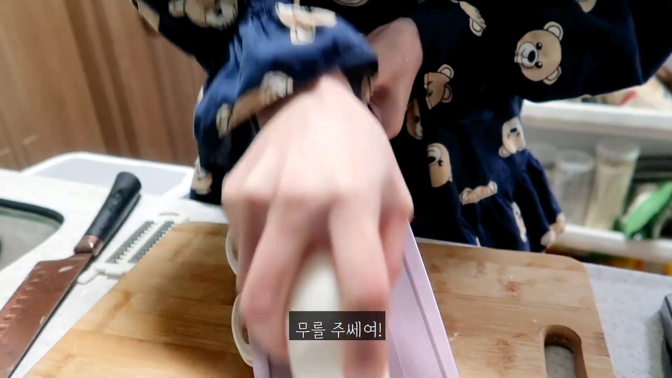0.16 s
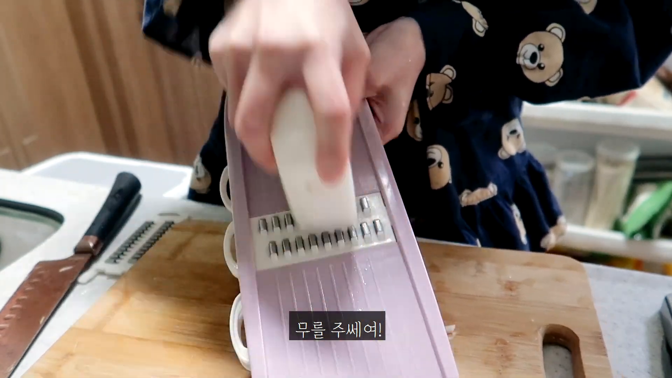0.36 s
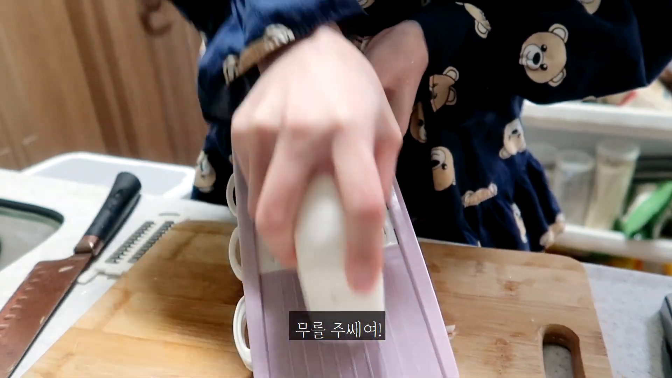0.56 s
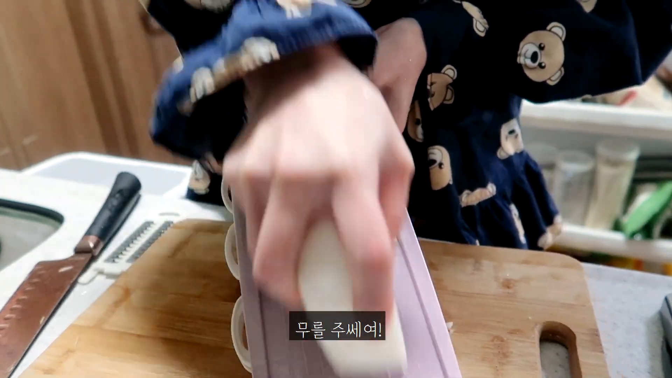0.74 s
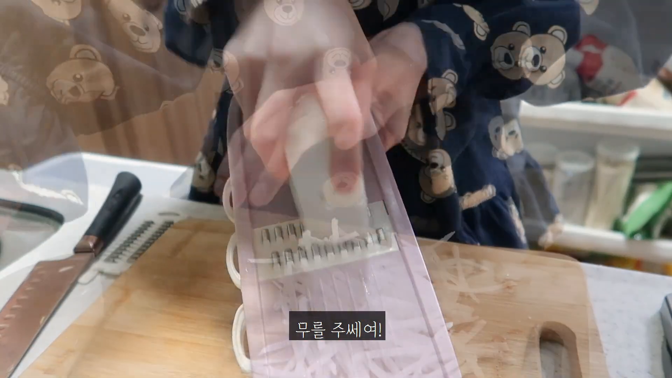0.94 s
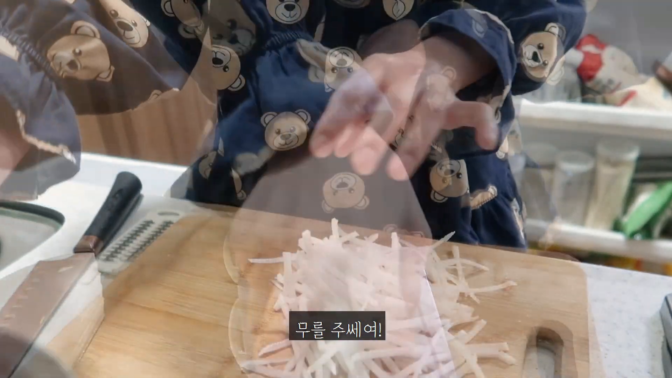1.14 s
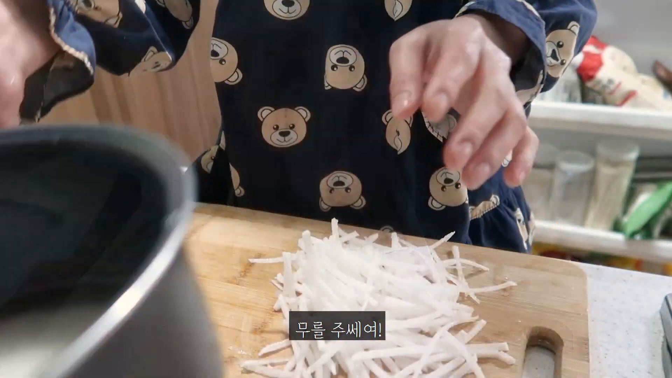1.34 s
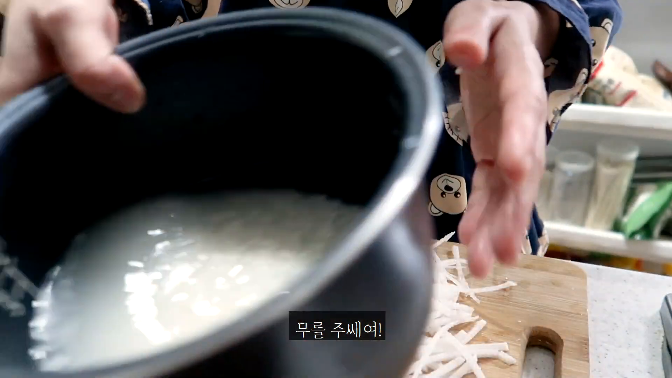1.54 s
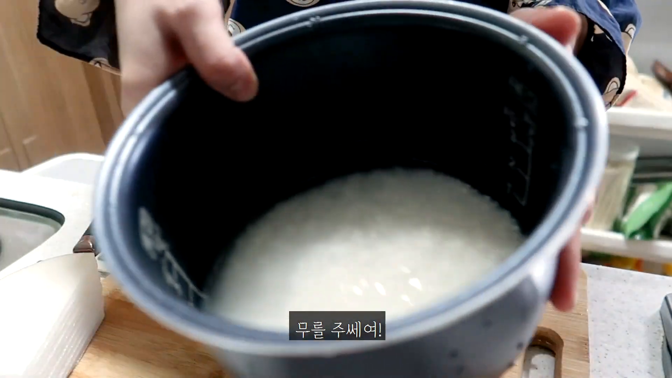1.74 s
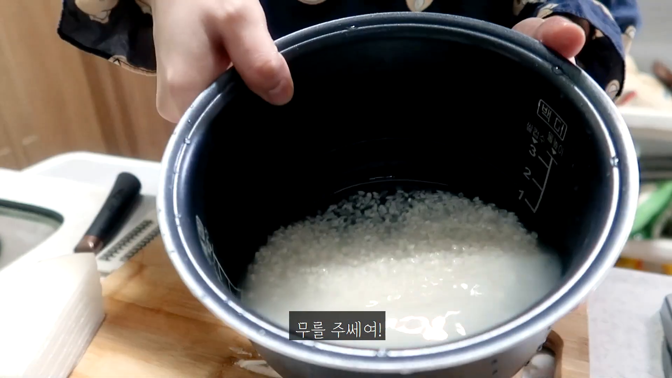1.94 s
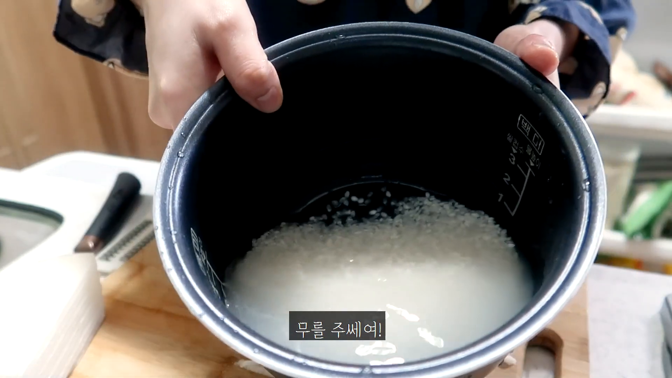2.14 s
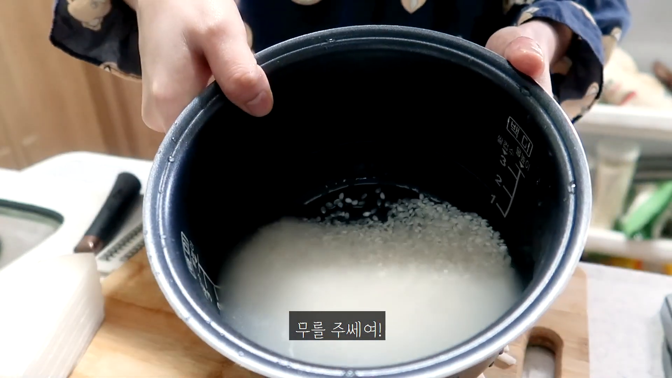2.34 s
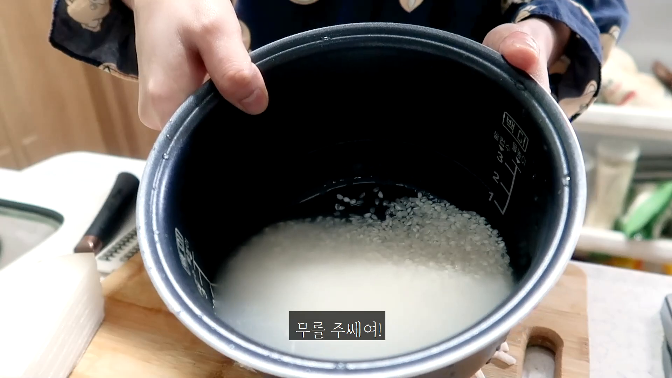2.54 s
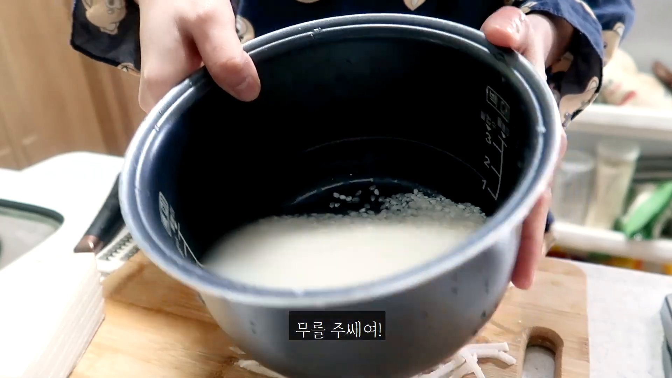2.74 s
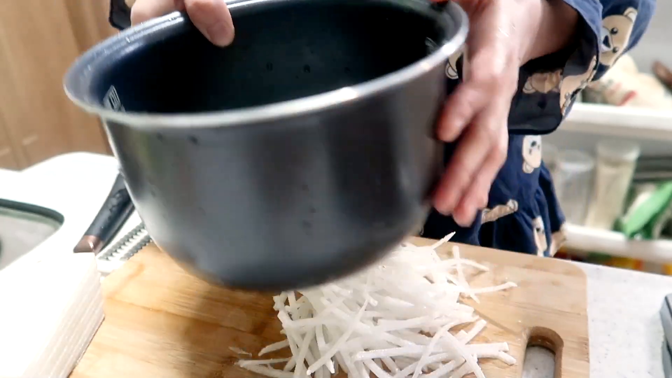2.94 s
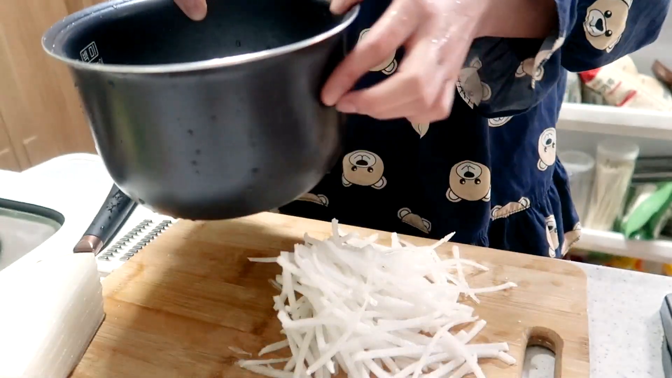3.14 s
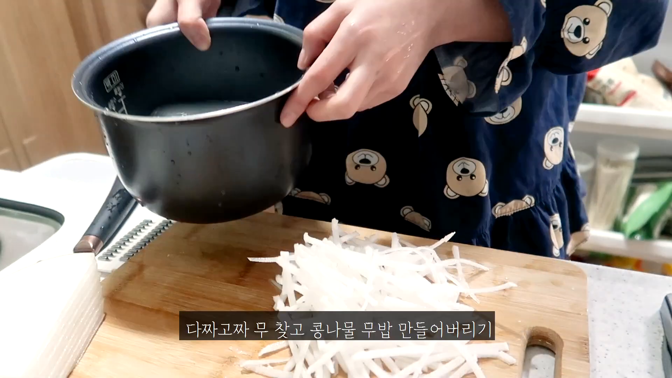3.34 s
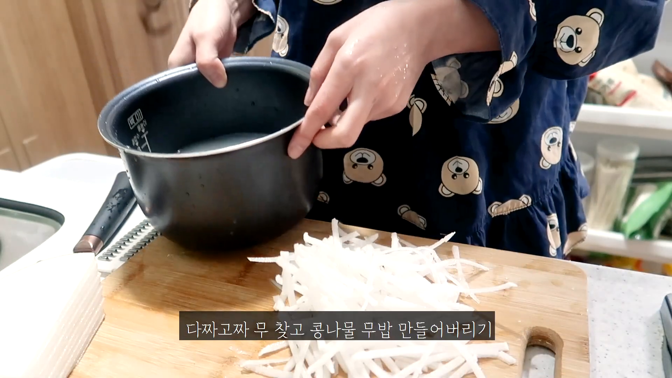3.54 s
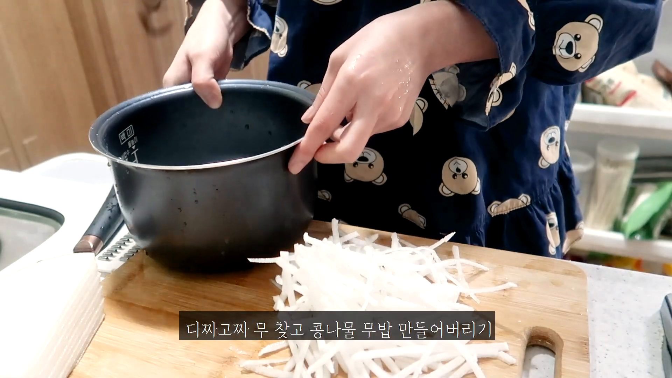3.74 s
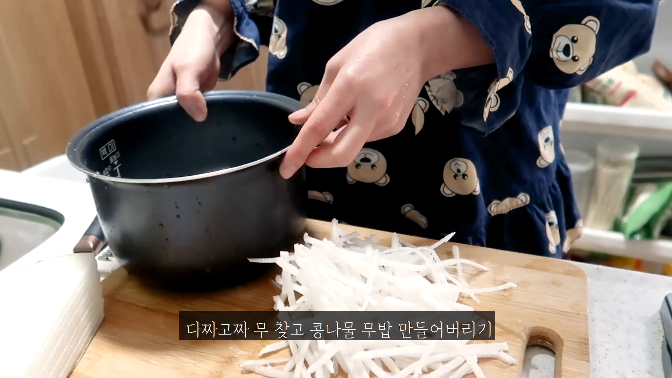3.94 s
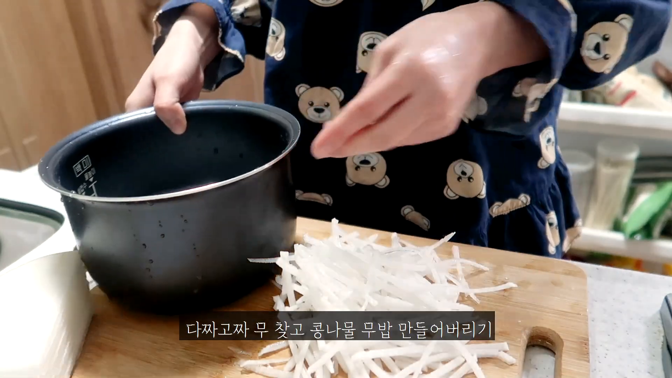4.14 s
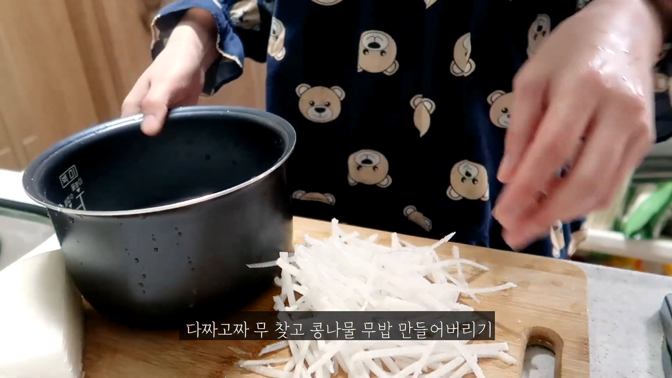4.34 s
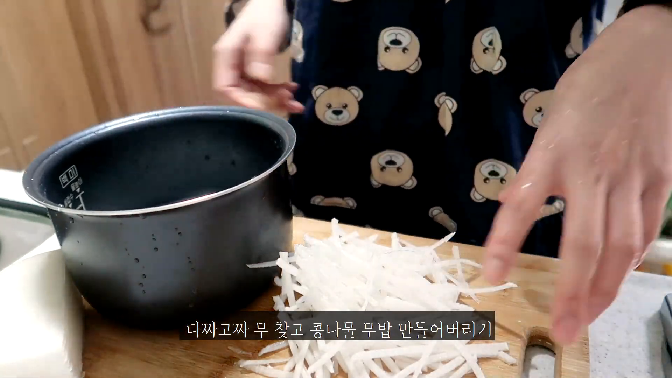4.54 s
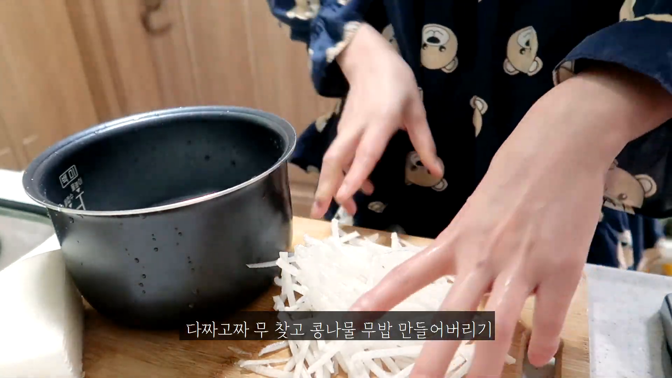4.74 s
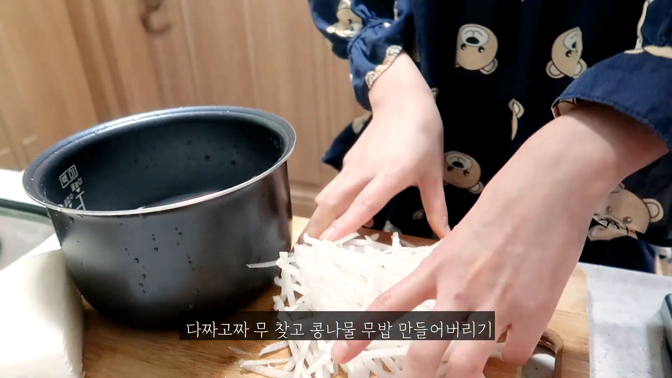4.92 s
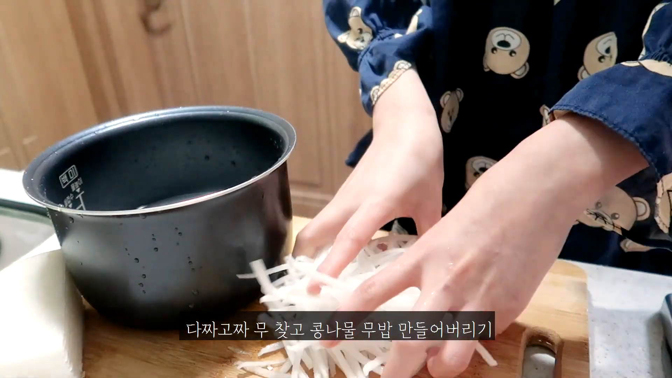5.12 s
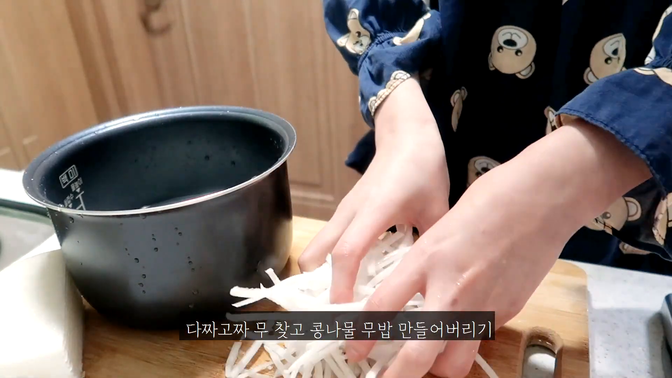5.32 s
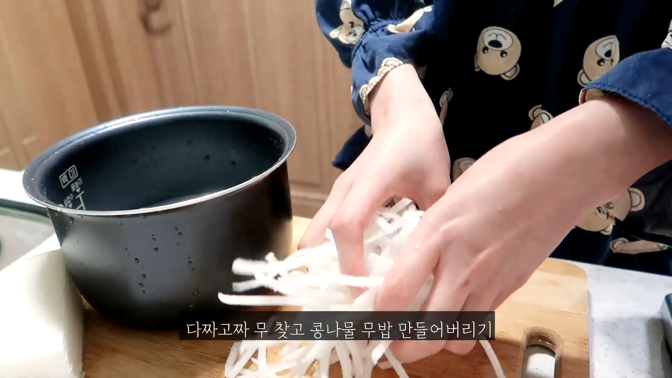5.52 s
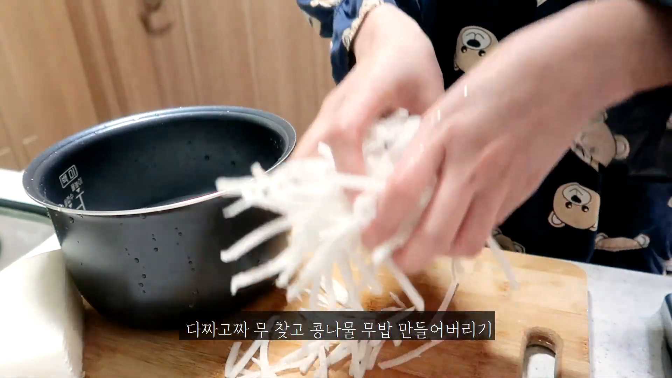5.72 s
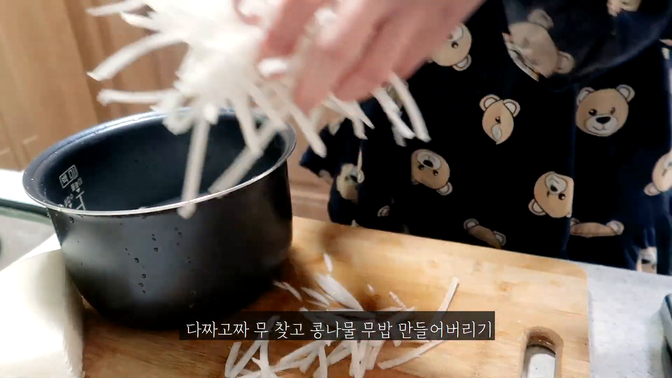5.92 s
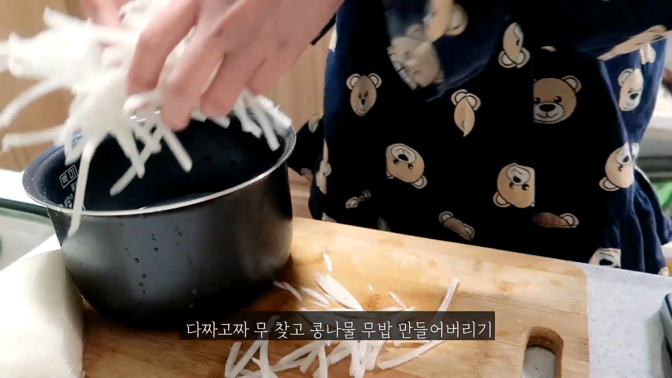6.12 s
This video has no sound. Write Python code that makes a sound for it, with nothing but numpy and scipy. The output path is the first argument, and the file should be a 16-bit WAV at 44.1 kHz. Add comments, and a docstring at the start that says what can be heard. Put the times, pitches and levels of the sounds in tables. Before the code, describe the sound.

In a small kitchen with a soft appliance hum, a firm radish is grated in quick wet strokes on a plastic slicer, clacking and booming at the turns. The rasp stops abruptly; faint handling ticks follow. A metal pot knocks hard on a wooden board and slides grittily, then wet shreds are scooped up with soft crunches. Close stereo microphone, short room tail.

```python
"""First a radish is pushed in quick strokes over the teeth of a plastic slicer: noise grains rasp, plate and frame ring.
Then a metal pot comes with small ticks, is knocked down on a wooden board (ringing tones) and slid aside (gritty noise).
A sleeve rustles and wet shreds are gathered up, crackling; short gliding tones groan here and there.
All along, a small kitchen with a humming appliance is heard close by in stereo, as soft noise and two low tones."""
import sys
import numpy as np
from scipy import signal
from scipy.fft import rfft, irfft, next_fast_len
from scipy.io import wavfile
from scipy.ndimage import uniform_filter1d, map_coordinates

SR = 44100
rng = np.random.default_rng(int(sys.argv[2]) if len(sys.argv) > 2 else 0)


def transcribe(u):
    """Save the signal u as a 16-bit wav file named by the first command-line argument.

    u: samples, shape (n,) or (channels, n), limited to [-1, 1]; the rate is SR.
    q: integer samples, one column per channel.
    """
    v = np.clip(np.atleast_2d(u).T, -1, 1)
    q = np.round(v * 32767).astype(np.int16)
    wavfile.write(sys.argv[1], SR, q)


N = 276507
TIME = np.arange(N) / SR  # seconds
TAIL = TIME[:SR // 2]  # half a second, for short sounds and rings

# All dB below are relative: later steps mix the sounds. T60 is the time to fade by 60 dB;
# a time constant is the time to fade to about 37 percent.

# Soft fan noise. Each row: frequency in Hz, level in dB.
FAN_SPECTRUM = [(13, -63), (22, -12.5), (123, -2.5), (224, -12), (279, -10), (319, -20.5), (420, -16),
                (582, -22), (745, -16.5), (877, -24), (1030, -23.5), (2040, -31.5), (3000, -34.5),
                (11400, -53), (15000, -71)]
FAN_DB = -50.5
# Steady tones of the appliance. Each row: frequency in Hz, level in dB before it wavers.
HUM_TONES = [(86, -53), (118, -52.5)]

# Side (left-right difference) against middle for spread-out sound. Each row: frequency in Hz, level in dB.
DIFFUSE_SIDE = [(60, -33), (110, -29), (200, -10.5), (400, -6), (1300, -6.5), (12000, 2)]
# Side made by the time lag between the two channels. Each row: frequency in Hz, level in dB.
LAG_SIDE = [(100, -71), (1300, -36), (2400, -20.5), (4400, -22), (13000, -9)]
# Side made by short reflections from the board and the pot. Each row: frequency in Hz, level in dB.
REFLECTION_SIDE = [(100, -58), (1300, -47.5), (2600, -30), (4400, -8), (6500, -5.5), (8500, 1),
                   (13000, 4.5)]
REFLECTION_T60_S, ROOM_T60_S, ROOM_TREBLE_T60_S = 0.041, 0.26, 0.3
TOP_HZ = 15500

# The arm reaches out. In order: start in seconds, end in seconds, level in dB.
SLEEVE_REACH = (4.67, 4.82, -57)
# Rustling cloth. Each row: frequency in Hz, level in dB.
SLEEVE_SPECTRUM = [(400, 1), (900, 3), (2000, -2), (3000, 0), (3800, -5), (5000, -12), (12000, -31)]

# Wet surfaces rub, stick and slip. Each row: start in seconds, length in seconds, start pitch in Hz,
# end pitch in Hz, level in dB, pitch scatter as a share of the pitch.
GROANS = [(0.459, 0.018, 1570, 1550, -35, 0.02), (0.902, 0.054, 3080, 2950, -46.5, 0.01),
          (1.198, 0.0198, 1005, 590, -31, 0.14), (4.158, 0.071, 318.5, 159, -38, 0.09),
          (4.297, 0.025, 3950, 4100, -51, 0.02), (4.245, 0.045, 241, 151, -34.5, 0.06),
          (5.015, 0.12, 476, 573, -43.5, 0.1), (5.842, 0.067, 2330, 2360, -61, 0)]

# Small ticks of handled kitchenware. Each row: start in seconds, level in dB, centre in Hz, width in Hz,
# T60 of the chatter in seconds, chatter against the first click in dB.
TICKS = [(1.187, -46, 3170, 3570, 0.064, 8), (1.2024, -29, 633, 420, 0.092, 3.5),
         (1.204, -32, 260.5, 160, 0.067, 10), (1.213, -33.5, 3600, 6400, 0.031, 9),
         (1.272, -45, 2960, 3960, 0.042, 4), (1.847, -59, 3300, 2500, 0.033, 7),
         (1.885, -54.5, 3870, 3000, 0.11, 8), (1.969, -47.5, 2830, 2490, 0.028, 4),
         (2.15, -59, 2500, 2200, 0.031, 10), (2.42, -40.5, 2170, 2200, 0.028, 0),
         (2.449, -52.5, 3430, 2500, .03, 12), (2.526, -55.5, 3000, 900, 0.032, 14),
         (2.679, -39, 1700, 4000, 0.033, 3), (2.826, -38, 2650, 700, 0.07, -6),
         (3.011, -49.5, 6100, 11000, 0.02, 1), (3.105, -55.5, 1550, 700, .04, 10),
         (3.452, -53, 5000, 8000, 0.085, 5), (5.028, -45, 5200, 3500, 0.06, 8)]
TICK_EDGE_DB = -11  # bright edge of the contact against its resonance

# Fingers brush the rim. Each row: start in seconds, level in dB.
RIM_TOUCHES = [(3.494, -63), (4.946, -57.5)]
# Thin metal ring of the pot. Each row: frequency in Hz, level in dB, T60 in seconds.
RIM_MODES = [(2975, 0, .3), (3640, -5, .18), (4285, -13, .14), (5050, -11, .18), (7550, -15, .08),
             (8200, -15, .08)]

# Hands sweep through the shreds, then lift them. Each row: start in seconds, end in seconds,
# level in dB, rumble of the board against the sweep in dB.
SWEEPS = [(4.947, 5.534, -54, 0.5), (5.194, 5.29, -60, 9), (5.855, 6.27, -59, -19)]
SWEEP_ATTACK_S, SWEEP_RELEASE_S = 0.026, 0.02  # release is a time constant
# Bunches of shreds crunch in the fist. Each row: start in seconds, level in dB, fade time constant in seconds.
SQUEEZES = [(5.026, -43, 0.015), (5.05, -54, 0.0072), (5.07, -46.5, .008), (5.109, -40, 0.012),
            (5.122, -46, 0.017), (5.208, -40, 0.0056), (5.221, -43, .006), (5.231, -43.5, .005),
            (5.239, -45, 0.007), (5.247, -47, 0.011), (5.265, -43, .005), (5.281, -45, 0.025),
            (5.326, -54, .005), (5.358, -43, 0.006), (5.429, -49.5, 0.027), (5.505, -45, 0.014)]
SQUEEZE_THUMP_DB = -0.5  # each crunch presses on the board
# Shreds rubbing each other. Each row: frequency in Hz, level in dB.
SHRED_SPECTRUM = [(210, -10), (400, -24), (650, 2), (1000, -2.5), (1700, -11), (2100, -13.5), (3100, -19),
                  (4200, -21.5), (6500, -29.5), (10000, -45), (15000, -46)]
# Strips snapping in the fist. Each row: frequency in Hz, level in dB.
SNAP_SPECTRUM = [(210, -10), (350, -4), (700, 0), (1070, 0), (1740, 2), (1950, -23), (2200, 1),
                 (2700, -3.5), (3400, -20), (4310, -30), (7770, -40), (13000, -49)]

# Wooden board under the pot. Each row: frequency in Hz, level in dB, T60 in seconds.
BOARD_MODES = [(94, -1, 0.04), (117.7, 1.5, 0.11), (179, -4.5, 0.12), (198.7, -11.5, 0.096),
               (301.3, -10.5, 0.16), (392, -4, 0.079), (426, -14.5, 0.077), (529, -13, 0.15),
               (663, -4.5, 0.05), (852, 0.5, 0.035), (986, -3.5, 0.034), (1323, -1.5, 0.014),
               (1580, 2.5, 0.021), (1780, 2.5, 0.013)]
# Shoves of the pot over the board, first tilted, then flat. Each row: start in seconds, end in seconds,
# level in dB before it wavers, contact softness as a cut-off in Hz.
SHOVES = [(3.817, 4.13, -60, 3200), (4.114, 4.385, -52, 11900)]
SHOVE_ATTACK_S, SHOVE_RELEASE_S, SHOVE_RUMBLE_DB = 0.015, 0.061, 1.5  # release is a time constant
# Grit of the sliding pot. Each row: frequency in Hz, level in dB.
GRIT_SPECTRUM = [(290, -22), (500, -11), (750, 6), (950, -7.5), (1500, 1.5), (1950, -4.5), (2250, -2),
                 (3400, -10), (4020, -6.5), (4500, -16.5), (5700, -20.5), (8000, -31), (14000, -43)]
# Blows on the board as the pot lands, rocks and settles. Each row: start in seconds, level in dB,
# contact softness as a cut-off in Hz.
KNOCKS = [(3.7216, -13.5, 9100), (3.7405, -27, 900), (3.805, -34.5, 333), (4.1193, -19, 218),
          (4.1237, -27, 510), (4.141, -40, 597), (4.947, -31.5, 300)]
# Deep dense small modes of pot and board. Each row: frequency in Hz, level in dB.
THUD_SPECTRUM = [(30, -63), (70, -2.5), (130, 6), (380, -2), (700, -7.5), (1100, -16.5), (4000, -70)]
# Bright dense small modes of pot and board. Each row: frequency in Hz, level in dB.
CLATTER_SPECTRUM = [(60, -43), (300, -31), (750, -8.5), (930, 11), (1160, -3), (1400, 1), (1750, -1),
                    (2000, -6), (2600, -9.5), (5000, -25), (10000, -44)]
# Crack of the contact. Each row: frequency in Hz, level in dB.
CRACK_SPECTRUM = [(60, -46), (300, -6), (900, 10), (1150, -12), (1600, 1), (2400, -1), (5200, -15.5),
                  (7000, -50), (12000, -48)]

# Plastic plate of the slicer. Each row: frequency in Hz, level in dB, T60 in seconds.
PLATE_MODES = [(1040, 3.5, 0.057), (1089, -0.5, 0.054), (1211, -6, 0.16), (1360, -1, 0.026),
               (1500, -11, 0.29), (1562, 1, 0.034), (1767, -2, 0.057), (2185, 10.5, 0.027),
               (2525, 3.5, 0.045), (2987, 7, 0.034), (3460, 3, 0.03), (4200, 1, 0.025)]
# The whole slicer flexing. Each row: frequency in Hz, level in dB, T60 in seconds.
FRAME_MODES = [(106, -9.5, 0.091), (179.7, 0.5, 0.14), (376.5, -13.5, 0.093), (602, -11.5, 0.049),
               (758, -17.5, 0.11)]
# The radish bumps the slicer as it turns round or meets the teeth; the grip retunes both rings.
# Each row: time in seconds, clack in dB, boom in dB, clack pitch ratio, boom pitch ratio,
# contact time constant in seconds.
BUMPS = [(0.036, -30, -29, 0.9, 0.663, 0.0011), (0.0417, -27, -23.5, 1.05, 0.67, 0.0014),
         (0.056, -31, -26, 0.75, 1.03, 0.0033), (0.069, -16, -15.5, 1.035, 0.96, .002),
         (0.171, -24, -33, 0.94, 0.85, 0.0021), (0.261, -23.5, -23, 0.94, 0.98, 0.0043),
         (0.284, -27, -27, 1.13, 0.72, 0.0045), (0.431, -31.5, -16.5, 1.12, 0.98, .003),
         (0.496, -29.5, -21.5, 1, 0.92, 0.0021), (.517, -32, -35, 0.96, 0.7, .003),
         (0.5304, -13, -14, 1.046, 0.98, .0027), (0.744, -17.5, -23.5, 1.24, 0.98, .0018),
         (.762, -30.5, -26, 1.4, .7, 0.0043), (.838, -38, -26.5, 1.24, 0.77, 0.0043),
         (0.885, -30.5, -25, 1.13, 0.96, .003), (.967, -33.5, -34, 1, 0.98, 0.0017),
         (.976, -31, -22, 1.03, 0.86, 0.0031), (1.007, -26.5, -23.5, 1.02, 1, .004),
         (1.079, -24.5, -33, 1.22, .7, .002)]
BUMP_BUILD_S = 0.012  # time constant
# Contact of a bump. Each row: frequency in Hz, level in dB.
CLACK_SPECTRUM = [(200, -20), (750, -12.5), (1020, 0.5), (1300, 3.5), (1700, -6), (2400, -9), (3400, -13.5),
                  (4800, -25.5), (9000, -41), (15000, -58)]

# Pushes of the radish down over the teeth. Each row: start in seconds, end in seconds, level at the end in dB,
# swell over the push in dB, attack in seconds, spray of juice against the push in dB.
PUSHES = [(0, 0.017, -38.5, -6.5, 0.0015, 5), (0.135, 0.256, -27, 0.5, 0.017, -16),
          (0.587, 0.717, -26.5, 2, 0.0023, -9.5), (1.015, 1.16, -25.5, 3, 0.03, -8)]
PUSH_RELEASE_S, CUTTING_SHARE = 0.025, 0.83  # release is a time constant
# Past the teeth the radish glides out on the plastic, fading.
GLIDE_DB, GLIDE_FADE_S = -10.5, 0.088  # fade is a time constant
# The rasp is cut off abruptly.
CUT_OFF_S, CUT_OFF_FADE_S = 1.137, 0.00065  # fade is a time constant
# Pulls back up the slicer. Each row: start in seconds, end in seconds, level at the end in dB.
PULLS = [(0.024, 0.064, -32.5), (0.421, 0.549, -37), (0.88, 1.011, -37)]
PULL_ATTACK_S, PULL_RELEASE_S = 0.013, 0.033  # release is a time constant
PULL_SWELL_DB, PULL_SAG_DB, PULL_CUTTING_SHARE = -2, 9.5, 0.3  # the sag is deepest half way
# Tearing flesh. Each row: frequency in Hz, level in dB.
TEAR_SPECTRUM = [(300, -29), (450, -37), (560, -6), (850, -21.5), (1080, -5.5), (1560, 4), (1940, -5),
                 (2600, -2), (3400, -5), (4400, -10), (6500, -14.5), (9450, -25.5), (12500, -25),
                 (15500, -38)]
# Flesh sliding on plastic. Each row: frequency in Hz, level in dB.
SLIDE_SPECTRUM = [(200, -6.5), (600, -8), (1150, -3), (2000, -4.5), (3300, -13.5), (5000, -17.5),
                  (9000, -33.5), (15000, -43)]
# Fine spray of juice. Each row: frequency in Hz, level in dB.
SPRAY_SPECTRUM = [(1500, -20), (2600, 3), (3400, 1), (5000, -1), (6600, -0.5), (9500, -15.5), (13000, -13),
                  (15500, -23)]
# The teeth catch and let go unevenly, which roughens the rasp.
CATCH_DB, CATCH_RATE = 1.1, 420  # rate in new random values a second


def undb(db):
    """Turn decibels into a gain."""
    return 10 ** (np.asarray(db) / 20)


def unit(x):
    """Scale to an average (rms) strength of 1."""
    return x / np.sqrt(np.mean(x ** 2))


def blow(x):
    """Scale a short sound to the energy of rms 1 held for 4 ms."""
    return x / np.sqrt(np.sum(x ** 2) / (.004 * SR))


def add(out, s, x):
    """Mix x into out from time s in seconds."""
    i = int(max(s, 0) * SR)
    out[i:i + len(x)] += x[:N - i]


def through(x, response):
    """Pass a sound through an impulse response."""
    return signal.fftconvolve(x, response)[:len(x)]


def gains(points, size):
    """Read a spectrum table as gains on the bins of a transform."""
    hz, db = np.transpose(points)
    bin_hz = np.arange(size // 2 + 1) * SR / size
    return undb(np.interp(np.log(bin_hz + 1), np.log(hz), db))


def colour(x, points, size=4096):
    """Filter to the given spectrum, with no sound ahead of its cause."""
    cepstrum = irfft(np.log(gains(points, size)))
    # folding the cepstrum forward gives the minimum-phase filter
    cepstrum[1:size // 2] *= 2
    cepstrum[size // 2 + 1:] = 0
    return through(x, irfft(np.exp(rfft(cepstrum))))


def fade(t60):
    """Decay that loses 60 dB in t60 seconds."""
    return undb(-60 * TAIL / t60)


def ring(modes):
    """Ring of a struck body: fading tones, neighbours swinging in opposite directions."""
    out = np.zeros(len(TAIL))
    for k, (hz, db, t60) in enumerate(modes):
        out += (-1) ** k * undb(db) * fade(t60) * np.sin(2 * np.pi * hz * TAIL)
    return out


def walk(rate):
    """Smooth random wandering of spread 1, from rate random values a second."""
    k = int(SR / rate)
    steps = np.repeat(rng.standard_normal(N // k + 1), k)
    smooth = uniform_filter1d(uniform_filter1d(steps, k), k)
    return unit(smooth[:N])


def grains(rate, spread_db):
    """A stream of tiny fractures, about rate a second, of uneven size."""
    size = undb(spread_db * np.minimum(rng.exponential(size=N), 4))
    happens = rng.random(N) < rate / SR
    return unit(happens * size * rng.standard_normal(N))


def pops(rate, hz, octaves, cycles):
    """A stream of small snaps up to some octaves off hz, each losing 60 dB within some cycles."""
    out, t = np.zeros(N), TAIL[:int(2 * cycles / hz * SR)]
    for place, pitch, size in rng.random((int(rate * N / SR), 3)):
        turns = hz * 2 ** (octaves * (2 * pitch - 1)) * t
        snap = undb(-60 * turns / cycles) * np.sin(2 * np.pi * turns)
        add(out, place * N / SR, size * snap)
    return unit(out)


def restless(x, depth_db, rate):
    """Each third of an octave swells and sinks on its own, as the place of contact shifts."""
    size = 2 * next_fast_len(N // 2 + 1)
    spectrum = rfft(x, size)
    hz = np.arange(len(spectrum)) * SR / size
    # all sound below 800 Hz moves with the lowest band, all above 12800 Hz with the highest
    third = 3 * np.log2(np.clip(hz, 800, 12800) / 800)
    out = np.zeros(N)
    for k in range(13):
        band = irfft(spectrum * np.maximum(1 - np.abs(third - k), 0))[:N]
        out += band * undb(depth_db * walk(rate))
    return unit(out)


def bend(x, share, rate):
    """Stretch and squeeze time a little, so the pitch of a ring wanders as the load moves."""
    place = TIME + share / rate * walk(rate)
    return map_coordinates(x, [place * SR], order=3, mode="nearest")


def gesture(start, end, attack_s, release_s, swell_db=0):
    """Force of one hand movement: it rises, swells (or sinks) towards its end and dies away."""
    progress = np.clip((TIME - start) / (end - start), 0, 1)
    rise = np.clip((TIME - start) / attack_s, 0, 1)
    release = np.exp(-np.maximum(TIME - end, 0) / release_s)
    return rise * undb(swell_db * (progress - 1)) * release


def stereo(mid, side):
    """Left and right from middle and side."""
    return np.array([mid + side, mid - side])


def background():
    """The appliance blows soft, slowly drifting fan noise and hums with wavering tones."""
    mid = unit(colour(rng.standard_normal(N), FAN_SPECTRUM))
    side = unit(colour(rng.standard_normal(N), FAN_SPECTRUM))
    drift_db = .5 * walk(2.5)
    fan = undb(FAN_DB + drift_db) * stereo(mid, colour(side, DIFFUSE_SIDE))
    hum = np.zeros(N)
    for hz, db in HUM_TONES:
        level = undb(db + 3.3 * walk(3.76))
        hum += level * np.sin(2 * np.pi * hz * TIME + 0.97 * walk(14))
    return fan + stereo(hum, 0)


def kitchen(x, wet_db, side_db):
    """Close sound reaches both channels out of step in the treble; walls and cupboards add a short tail, low and high."""
    # 1j is a quarter-turn shift between middle and side
    lag = irfft(1j * gains(LAG_SIDE, 2 * N) * rfft(x, 2 * N))[:N]
    scatter = rng.standard_normal(len(TAIL)) * fade(REFLECTION_T60_S)
    reflections = through(colour(x, REFLECTION_SIDE), scatter / np.linalg.norm(scatter))
    tails = []
    for _ in range(2):
        low = colour(rng.standard_normal(len(TAIL)), [(90, 8.5), (300, 1.5), (1200, 0.5), (5000, -7)])
        high = colour(rng.standard_normal(len(TAIL)), [(500, -15.5), (2500, 2.0), (12000, 6.5)])
        # the walls answer after 3 ms
        onset = np.clip((TAIL - .003) / 0.0024, 0, 1)
        tail = (low * fade(ROOM_T60_S) + high * fade(ROOM_TREBLE_T60_S)) * onset
        tails.append(undb(wet_db) * through(x, tail / np.linalg.norm(tail)))
    side = undb(side_db) * (lag + reflections)
    return stereo(x + tails[0], side + colour(tails[1], DIFFUSE_SIDE))


def sleeve():
    """Cloth brushes past: noise that swells with the reach."""
    start, end, db = SLEEVE_REACH
    rustle = unit(colour(grains(4000, 1.3), SLEEVE_SPECTRUM))
    return undb(db) * gesture(start, end, end - start, SWEEP_RELEASE_S) * rustle


def groans():
    """Wet surfaces stick and slip in short uneven tones that glide as the pressure changes."""
    out = np.zeros(N)
    for s, length, start_hz, end_hz, db, scatter in GROANS:
        progress = np.clip((TIME - s) / length, 0, 1)
        glide_hz = start_hz + (end_hz - start_hz) * np.sqrt(progress)
        hz = glide_hz * (1 + scatter * walk(260))
        level = undb(db + 2 * walk(120)) * np.sin(np.pi * progress)
        out += level * np.sin(2 * np.pi * np.cumsum(hz) / SR)
    return out


def ticks():
    """Each tick is a sharp click and a brief chatter in one broad resonance, with a bright edge."""
    out = np.zeros(N)
    for s, db, hz, width_hz, t60, chatter_db in TICKS:
        click = blow(signal.unit_impulse(len(TAIL)))
        chatter = blow(rng.standard_normal(len(TAIL)) * fade(t60))
        contact = click + undb(chatter_db) * chatter
        burst = signal.lfilter(*signal.iirpeak(hz, hz / width_hz, fs=SR), contact)
        # low-pitched ticks get less edge
        edge_gain = undb(TICK_EDGE_DB) * min(hz / 3000, 1) ** 2
        edge = edge_gain * colour(contact, [(1000, -20), (4000, 15), (6000, -6), (14000, -4)])
        tick = colour(burst + edge, [(3000, 3.5), (7000, -4.5), (14000, -16.0)])
        add(out, s, undb(db) * blow(tick))
    return out


def rim_touches():
    """Fingers brush the thin metal rim, which rings faintly."""
    out = np.zeros(N)
    for s, db in RIM_TOUCHES:
        add(out, s, undb(db) * ring(RIM_MODES))
    return out


def rumble(force):
    """Rubbing shakes the board's modes with a stream of small shocks."""
    tilt = [(60, 0.0), (120, -13.0), (190, -1.0), (550, -14.0), (1200, -19.0), (4000, -12)]
    body = colour(ring(BOARD_MODES), tilt)
    return through(grains(820, 3.4) * force, body / np.linalg.norm(body))


def shreds():
    """Wet strips rub against each other; a squeeze snaps many at once and thumps the board."""
    force, pressure = np.zeros(N), np.zeros(N)
    for start, end, db, rumble_db in SWEEPS:
        sweep = undb(db) * gesture(start, end, SWEEP_ATTACK_S, SWEEP_RELEASE_S)
        force += sweep
        pressure += undb(rumble_db) * sweep
    squeeze = np.zeros(N)
    for s, db, fade_s in SQUEEZES:
        squeeze += undb(db) * (TIME >= s) * np.exp(-np.abs(TIME - s) / fade_s)
    rub = undb(-2.0) * force * unit(colour(grains(1400, 1.1), SHRED_SPECTRUM))
    crackle = undb(-9) * pops(rate=1200, hz=2000, octaves=.6, cycles=12)
    squelch = undb(-5.0) * unit(colour(grains(5000, 0.44), SNAP_SPECTRUM))
    thump = undb(SQUEEZE_THUMP_DB) * unit(colour(grains(5000, 0.56), THUD_SPECTRUM))
    # wet flesh yields over a millisecond (44 samples), so a squeeze has no hard edge
    snap = uniform_filter1d(squeeze, size=44) * (squelch + crackle + thump)
    return rub + snap + rumble(pressure)


def scrape():
    """The pot's base slides over the damp wood, sticking and slipping: gritty noise and rumble."""
    out = np.zeros(N)
    for start, end, db, soft_hz in SHOVES:
        waver_db = .8 * walk(50)
        force = undb(db + waver_db) * gesture(start, end, SHOVE_ATTACK_S, SHOVE_RELEASE_S)
        grit = restless(colour(grains(5000, 1.5), GRIT_SPECTRUM), depth_db=2, rate=70)
        contact = signal.butter(2, soft_hz, fs=SR, output="sos")
        out += signal.sosfilt(contact, force * grit)
        out += undb(SHOVE_RUMBLE_DB) * rumble(force)
    return out


def knocks():
    """The pot lands edge first, then settles flat; softer contacts reach only the board's low modes."""
    out = np.zeros(N)
    for s, db, soft_hz in KNOCKS:
        thud = blow(colour(rng.standard_normal(len(TAIL)) * fade(0.29), THUD_SPECTRUM))
        clatter = blow(colour(rng.standard_normal(len(TAIL)) * fade(0.21), CLATTER_SPECTRUM))
        crack = blow(colour(signal.unit_impulse(len(TAIL)), CRACK_SPECTRUM))
        hit = ring(BOARD_MODES) + undb(-2.5) * thud + undb(-12.5) * clatter + undb(-9.5) * crack
        contact = signal.butter(4, soft_hz, fs=SR, output="sos")
        add(out, s, undb(db) * signal.sosfilt(contact, hit))
    return out


def plate(x, pitch=1):
    """The ring that a contact sound leaves in the plastic plate."""
    modes = np.zeros(len(TAIL))
    for hz, db, t60 in PLATE_MODES:
        modes += undb(db) * fade(t60) * np.cos(2 * np.pi * hz * pitch * TAIL)
    return through(x, modes / np.linalg.norm(modes))


def bumps():
    """The radish catches on the teeth: a brief crunch rings the plate and the frame booms."""
    out = np.zeros(N)
    for s, clack_db, boom_db, clack_pitch, boom_pitch, contact_s in BUMPS:
        # the crunch grows to its peak at s, then fades
        lead = 4 * contact_s
        crunch = rng.standard_normal(len(TAIL)) * np.exp(-np.abs(TAIL - lead) / contact_s)
        clack = colour(crunch, [(hz * clack_pitch, db) for hz, db in CLACK_SPECTRUM])
        ringing = undb(-13.0) * plate(clack, clack_pitch)
        add(out, s - lead, undb(clack_db) * blow(clack + ringing))
        # the heavy frame takes a cycle or two to get going
        boom = ring([(hz * boom_pitch, db, t60) for hz, db, t60 in FRAME_MODES])
        build = 1 - np.exp(-TAIL / BUMP_BUILD_S)
        add(out, s - contact_s, undb(boom_db) * boom * build)
    return out


def strokes():
    """Force of cutting, sliding and spraying: each push tears the flesh and glides out, each pull rubs back."""
    cutting, sliding, spraying = np.zeros(N), np.zeros(N), np.zeros(N)
    for start, end, db, swell_db, attack_s, spray_db in PUSHES:
        push = undb(db) * gesture(start, end, attack_s, PUSH_RELEASE_S, swell_db)
        progress = np.clip((TIME - start) / (end - start), 0, 1)
        # most teeth are in the flesh around mid-stroke, where juice sprays most too
        bite = np.clip(CUTTING_SHARE * (0.88 + 0.54 * np.sin(np.pi * progress * .78)), 0, 1)
        cutting += push * np.sqrt(bite)
        sliding += push * np.sqrt(1 - bite)
        spraying += undb(spray_db) * push * np.sin(np.pi * progress * .9)
        glide = undb(db + GLIDE_DB) * gesture(start, end, end - start, GLIDE_FADE_S)
        cutting += glide * np.sqrt(PULL_CUTTING_SHARE)
        sliding += glide
    for start, end, db in PULLS:
        pull = undb(db) * gesture(start, end, PULL_ATTACK_S, PULL_RELEASE_S, PULL_SWELL_DB)
        progress = np.clip((TIME - start) / (end - start), 0, 1)
        pull *= undb(-PULL_SAG_DB * np.sin(np.pi * progress))
        cutting += pull * np.sqrt(PULL_CUTTING_SHARE)
        sliding += pull
    return cutting, sliding, spraying


def rasp():
    """The teeth burst cells by the thousand and snap fibres; on the way back the flesh mostly slides."""
    cutting, sliding, spraying = strokes()
    surge = undb(CATCH_DB * walk(CATCH_RATE) + 0.53 * walk(45.0))
    cells = restless(colour(grains(12000, 0.6), TEAR_SPECTRUM), depth_db=2, rate=260)
    # each fibre snaps with a short ring of its own pitch
    fibres = undb(-3) * pops(rate=1000, hz=2450, octaves=.7, cycles=16)
    tear = undb(-1.5) * (cells + fibres) * cutting * surge
    spray = unit(colour(grains(6000, 0.88), SPRAY_SPECTRUM)) * spraying * surge
    slide = unit(colour(grains(4000, 0.65), SLIDE_SPECTRUM)) * sliding * surge
    ringing = bend(plate(undb(-10) * tear + undb(-8) * slide), share=.01, rate=12)
    flex = ring(FRAME_MODES)
    shaking = grains(1500, 1.0) * (cutting + sliding)
    boom = bend(through(shaking, flex / np.linalg.norm(flex)), share=0.0634, rate=16)
    cut_off = np.exp(-np.maximum(TIME - CUT_OFF_S, 0) / CUT_OFF_FADE_S)
    return cut_off * (undb(-4.5) * (tear + spray + slide + ringing) + undb(-15.0) * boom)


def scene():
    """All sources in the kitchen, each with its own share of room sound and width."""
    slicer = kitchen(rasp() + bumps(), wet_db=-22.5, side_db=3.5)
    pot = kitchen(knocks() + rim_touches(), wet_db=-18.0, side_db=5)
    small_ticks = kitchen(ticks(), wet_db=-7, side_db=8.0)
    rubbing = kitchen(scrape() + sleeve() + groans(), wet_db=-6.0, side_db=0)
    gathering = kitchen(shreds(), wet_db=-3.5, side_db=1.5)
    return slicer + pot + small_ticks + rubbing + gathering + background()


def record(dry):
    """A steep low-pass filter cuts the top of the treble."""
    return signal.sosfilt(signal.ellip(10, .2, 80, TOP_HZ, fs=SR, output="sos"), dry)


dry = scene()
out = record(dry)
transcribe(out)
```